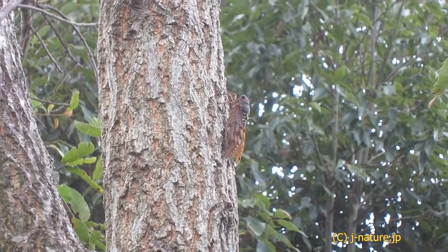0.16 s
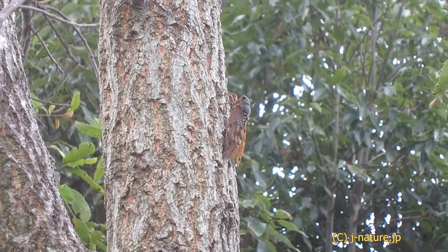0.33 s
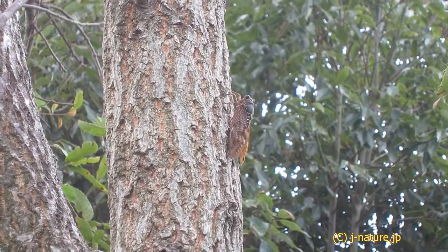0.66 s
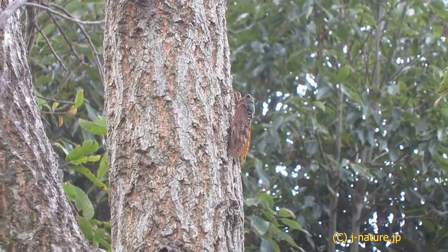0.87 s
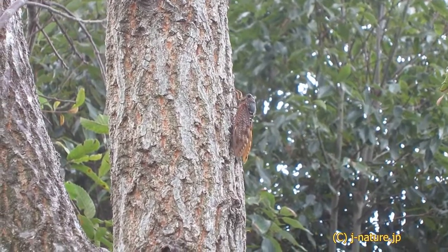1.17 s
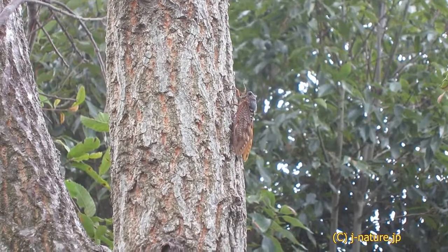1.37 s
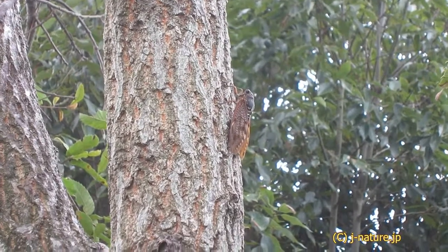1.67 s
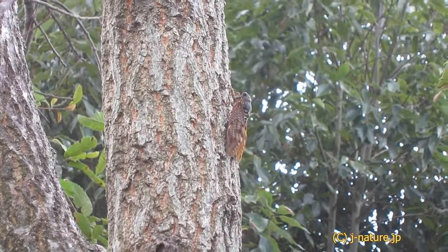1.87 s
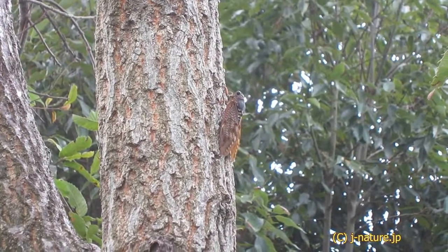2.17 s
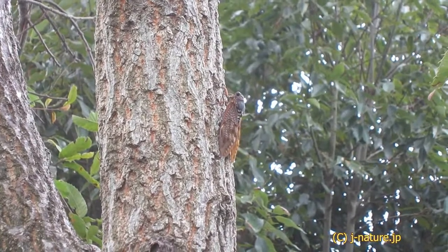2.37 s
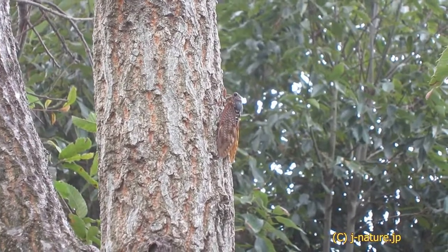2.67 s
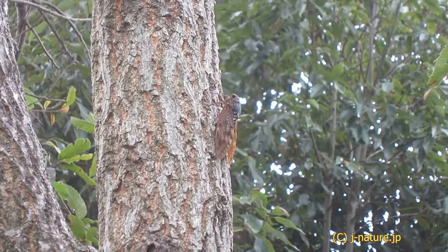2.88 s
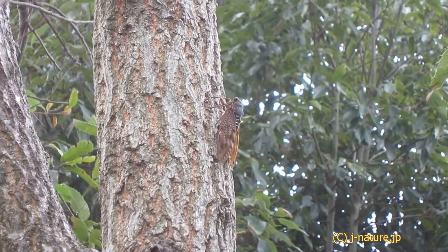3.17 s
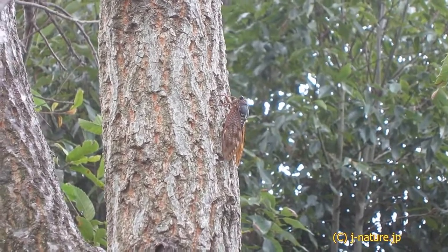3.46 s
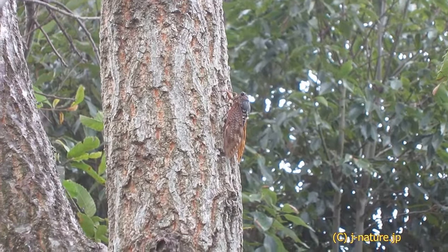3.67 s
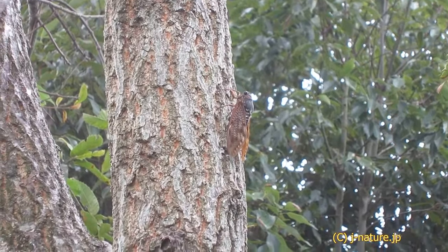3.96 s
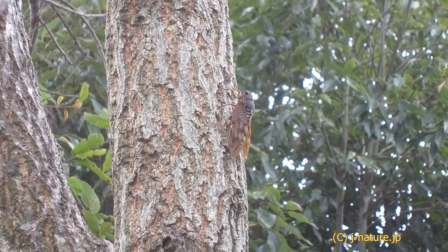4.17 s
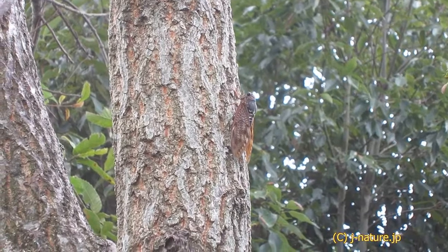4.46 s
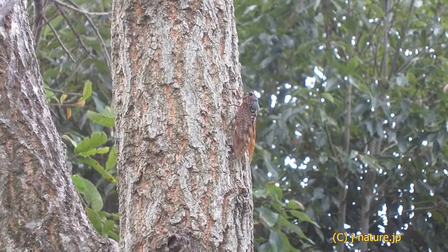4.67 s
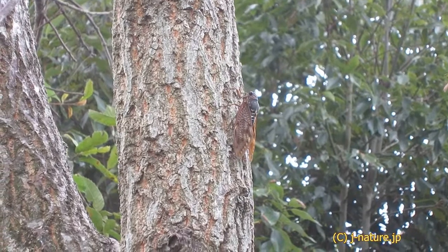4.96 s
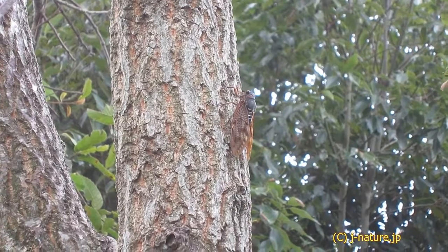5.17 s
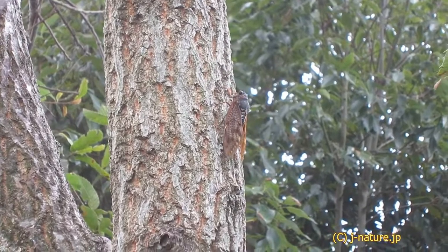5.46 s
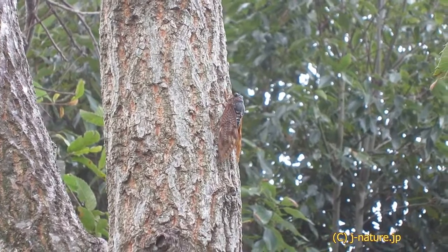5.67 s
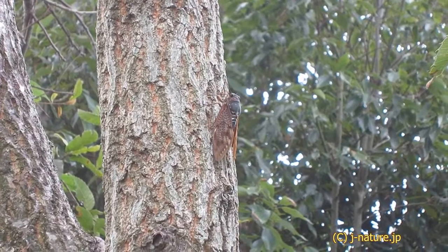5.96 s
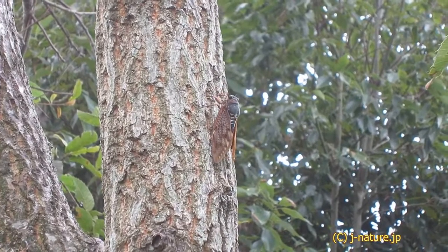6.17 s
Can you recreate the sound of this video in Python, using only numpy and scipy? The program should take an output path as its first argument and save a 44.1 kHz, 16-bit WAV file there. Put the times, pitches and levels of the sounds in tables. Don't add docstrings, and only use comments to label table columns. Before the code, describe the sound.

Close, dry and crisp: a cicada's woody clicks scatter irregularly, then burst into a rasping zip of some twenty strokes lasting under a tenth of a second, eleven times at regular spacing. Far quieter, another insect trills thinly and high, a bird twitters in quick dipping notes, a dove coos low, and distant rumble and airy leaf hiss fill the outdoor grove.

```python
import sys
import numpy as np
from scipy import signal
from scipy.fft import rfft, irfft, next_fast_len
from scipy.io import wavfile
from scipy.ndimage import uniform_filter1d, map_coordinates

SR = 44100
rng = np.random.default_rng(int(sys.argv[2]) if len(sys.argv) > 2 else 0)


def makeup_ratio(level_db):
    decades = np.asarray(level_db, float) / 20
    return 10 ** decades


def wrap_up_sound(samples):
    columns = np.atleast_2d(samples).T
    tamed = np.clip(columns, -1, 1)
    steps = np.round(tamed * 32767).astype(np.int16)
    wavfile.write(sys.argv[1], SR, steps)


N = 278712


def unit(x):
    return x / np.sqrt(np.mean(x ** 2) + 1e-20)


def along(points, hz):
    f, v = np.transpose(points)
    return np.interp(np.log(hz + 1), np.log(f + 1), v)


def wobble(rate):
    return map_coordinates(rng.standard_normal(int(N * rate / SR) + 4), [np.arange(N) * rate / SR])


def filtered(x, response):
    m = next_fast_len(N + SR // 2)
    return irfft(rfft(x, m) * response(np.fft.rfftfreq(m, 1 / SR)), m)[..., :N]


def resonant(modes):
    def response(f):
        total = 0
        for k, (centre, width, db) in enumerate(modes):
            damping = 1j * f * width
            total = total + (-1) ** k * makeup_ratio(db) * damping / (centre * centre - f * f + damping)
        return total
    return response


def rung(t, hz, t60, attack, phase=0.):
    t = np.maximum(t, 0)
    return np.sin(2 * np.pi * hz * t + phase) * makeup_ratio(-60 * t / t60) * (1 - np.exp(-(t / attack) ** 2))


def rush(spectrum, alike):
    def mid_side(hz):
        turn = np.arccos(np.clip(along(alike, hz), -1, 1)) / 2
        return makeup_ratio(along(spectrum, hz)) * [np.cos(turn), np.sin(turn)]
    mid, side = filtered(rng.standard_normal((2, N)), mid_side)
    return unit(np.array([mid + side, mid - side]))


def scattered(x, t60s):
    wet, step = np.zeros((2, N + SR)), SR // 3
    for start in range(0, N, step):
        hz, t, z = signal.stft(rng.standard_normal((2, SR // 4)), SR, nperseg=128)
        decay = makeup_ratio(-60 * t / along(t60s, hz)[:, None])
        tail = signal.istft(z * decay, SR, nperseg=128)[1]
        tail = tail / np.linalg.norm(tail[0])
        part = signal.fftconvolve(x[None, start:start + step], tail, axes=1)
        wet[:, start:start + part.shape[1]] += part
    return wet[:, :N]


def ticks():
    # time in s, ring in dB.
    away_alone = [(.0071, -20.5), (.0398, -25), (.8968, -24), (1.1291, -26.5), (1.1612, -24), (1.359, -25),
                  (1.3881, -23.5), (1.437, -23.5), (1.4672, -25.5), (1.7626, -24.5), (1.9249, -27),
                  (1.9899, -22), (2.0406, -25), (2.3234, -25.5), (2.3796, -27), (2.5792, -24),
                  (3.0454, -21), (3.1238, -23.5), (3.152, -21.5), (3.1781, -28), (3.4806, -22),
                  (3.536, -19), (3.5882, -21.5), (3.8154, -26), (4.0816, -21.5), (4.1363, -21.5),
                  (4.2689, -24.5), (4.3177, -26), (4.3579, -24.5), (4.4287, -22),
                  (4.478, -16.5), (4.6756, -23), (4.7004, -23.5), (4.7994, -24), (4.8888, -23.5),
                 (4.9814, -26), (5.2403, -21.5), (5.3077, -20), (5.3332, -22), (5.363, -22),
                 (5.4163, -20.5), (5.4653, -22), (5.531, -22), (5.5762, -20), (5.6295, -21.5),
                 (5.6543, -25), (5.664, -22), (5.8703, -22), (5.9991, -21), (6.0267, -21), (6.058, -20.5),
                 (6.091, -21), (6.1225, -24.5), (6.1975, -22), (6.2303, -25), (6.251, -21.5), (6.2675, -29)]
    # time in s, ring in dB.
    facing_alone = [(.4623, -27), (.534, -26.5), (.5814, -23.5), (.6032, -24.5), (.656, -23.5), (.729, -22),
                    (.7821, -21), (.8057, -27.5), (.8709, -26), (.8874, -26), (1.2708, -37), (1.524, -24),
                    (2.4231, -24), (2.666, -22.5), (2.6759, -20), (2.9037, -24), (2.9965, -28),
                    (3.0871, -25), (3.4523, -25), (3.623, -30), (3.642, -24), (3.7426, -26),
                    (3.7837, -26.5), (3.8378, -28), (4.182, -26.5), (4.2146, -26.5), (5.0353, -35),
                    (5.2939, -20.5), (5.435, -28), (5.5032, -27)]
    # time in s, ring in dB, lag in ms, second ring in dB.
    pair_rows = [(.0917, -25, 4.8, -23), (.1373, -27, 4.9, -26), (0.1835, -26, 6.2, -22.5),
                 (0.2289, -26, 6.2, -25.5), (0.27, -25, 6.5, -22), (.299, -23, 5.4, -20),
                 (1.0709, -25, 4.8, -22), (1.209, -24.5, 5.4, -21.5), (1.2604, -22.5, 6.3, -24),
                 (1.4902, -25.5, 4.9, -25), (1.5154, -23, 4.9, -27), (1.682, -23.5, 5.3, -21.5),
                 (1.7986, -22, 4.5, -23), (1.8809, -26, 4.8, -22.5), (2.0055, -29, 6, -23),
                 (2.0734, -21.5, 2.5, -24), (2.1, -26, 8.6, -24), (2.1167, -22, 4.6, -27),
                 (2.2813, -26.5, 4.5, -25), (2.3485, -21.5, 4.8, -19.5),
                 (2.4577, -26, 5.2, -21), (2.4925, -23.5, 7.1, -29), (2.5365, -23, 6.5, -28),
                  (2.8412, -26.5, 4.5, -24), (2.9335, -23.5, 6.9, -24), (2.9603, -21, 6.3, -21),
                  (3.2603, -23, 6.3, -22), (4.0254, -23.5, 5.5, -27.5), (4.1592, -25, 5.1, -20),
                  (4.4536, -24, 6.8, -20), (4.6268, -26, 5.7, -22.5), (4.935, -24.5, 6.6, -27),
                  (5.0264, -22.5, 4.9, -27), (5.0575, -22, 6.4, -21), (5.0729, -18, 3.7, -23),
                  (5.2682, -22.5, 5.5, -23.5), (5.8294, -21.5, 5.4, -22)]
    s, first_db, lag_ms, second_db = np.transpose(pair_rows)
    away = np.concatenate([away_alone, np.transpose([s, first_db])])
    facing = np.concatenate([facing_alone, np.transpose([s + lag_ms / 1000, second_db])])
    rows = []
    for tymbal, snap_db in ((away, -27), (facing, -22.5)):
        s, ring_db = tymbal.T
        snap_db = snap_db + 0.33 * (ring_db + 32.5) + 2.03 * rng.standard_normal(len(s))
        hz = 4570 + 14 * (ring_db + 18)
        rows.append(np.transpose([s, ring_db, hz, snap_db]))
    return rows


def buzzes():
    # first pair in s, last pair in s, strength in dB, top pitch in Hz.
    buzz_rows = [(0.3118, 0.3682, 2.5, 5680), (0.909, 0.9795, 2.5, 5570), (1.532, 1.5938, 3.5, 5580),
                 (2.126, 2.1904, 1.5, 5570), (2.688, 2.7619, 1.3, 5440), (3.278, 3.3435, 2, 5480),
                 (3.86, 3.9368, 1, 5440), (4.482, 4.5447, 2.7, 5490), (5.082, 5.1396, 1.2, 5350),
                 (5.672, 5.7445, 1.2, 5340), (6.271, 6.3412, 1.5, 5270)]
    stroke_counts = [20, 23, 21, 22, 23, 22, 24, 21, 20, 24, 22]
    # share of the buzz, ring in dB, abdomen stretch 0-1, snap in dB.
    swell_rows = [
        (0, -24, 0, -22.5),
        (.46, -18, 0.25, -19.5),
        (.72, -9, 0.96, -17.5),
        (1.001, -8.5, 1.001, -19.5),
    ]
    shortest_s, quickens = .00554, 2.6
    second_s, jitter_s = .00273, .00012
    share, *swell = np.transpose(swell_rows)
    rows = []
    for (first, last, db, top_hz), count in zip(buzz_rows, stroke_counts):
        back = np.arange((count + 1) // 2)
        slower = np.cumsum(back ** quickens)
        spare_s = last - first - shortest_s * back[-1]
        pairs = last - (shortest_s * back + spare_s * slower / slower[-1])[::-1]
        s = np.ravel(np.transpose([pairs, pairs + second_s]))[:count]
        s = s + jitter_s * rng.standard_normal(count)
        progress = (s - first) / (last - first)
        ring_db, stretch, snap_db = [np.interp(progress, share, c) for c in swell]
        snap_db += 0.28 * (-1.) ** (np.arange(count) + 1)
        rows.append(np.transpose([s, ring_db + db, 4570 + stretch * (top_hz - 4570), snap_db]))
    return rows


def abdomen(t, low_hz, high_hz, strain, shift, chance, own):
    t60 = .045 / (1 + 3.5 * strain)
    low = makeup_ratio(-4 + 3 * strain + .6 * own[:, 1:2]) * rung(t, low_hz, t60, .00022, shift)
    middle_phase = shift - 1.1 + .7 * chance[:, 9:10]
    middle = makeup_ratio(-7 - 3 * strain) * rung(t, (low_hz + high_hz) / 2, .014, .0004, middle_phase)
    high_phase = shift - 2.3 + .6 * strain + .25 * own[:, 3:4]
    high = makeup_ratio(.6 * own[:, 2:3]) * rung(t, high_hz, t60, .00022, high_phase)
    return low + middle + high


def buckling_thud(t, strain, chance):
    thud = makeup_ratio(-18 - 7 * strain) * rung(t, 2170, 0.009, 0.0004, chance[:, 8:9])
    thud = thud + makeup_ratio(-4 - 4 * strain) * rung(t, 3700, 0.0035, 0.00025)
    thud = thud + makeup_ratio(-8) * rung(t, 5800, .002, .0001)
    thud = thud + makeup_ratio(-15) * rung(t, 7500, 0.0025, .0001)
    return makeup_ratio(-9 * strain) * thud


def snap_back(back, strain, chance, own):
    # frequency in Hz, level in dB, t60 in s.
    rib_modes = [(2270, -19, 0.0033), (7290, -6, 0.0016), (8500, -7, 0.002), (9725, -6.5, 0.0039),
                 (12300, 4.5, 0.00063), (14760, -8.5, 0.002)]
    snap = 0
    for k, (f, db, t60) in enumerate(rib_modes):
        hz = f * (1 + 0.051 * strain + 0.033 * chance[:, 3 + k, None])
        level = makeup_ratio(db + 1.2 * own[:, 4 + k, None])
        snap = snap + level * rung(back, hz, t60, .00008, 0.34 * own[:, 11 + k, None])
    return snap


def cicada():
    # time in s, left-right difference in dB.
    balance_drift = [(0, .5), (1.2, 0.9), (3.2, 0.9), (5, 0.5), (6.32, 1.3)]
    s, ring_db, hz, snap_db = np.concatenate(ticks() + buzzes()).T[:, :, None]
    chance = rng.standard_normal((len(s), 50))
    index = (s * SR).astype(int) - 8 + np.arange(400)
    t = index / SR - s + .0001
    strain = np.clip((hz - 4550) / 1000, 0, 1.2)
    back = t - .00275 + 0.00019 * strain + .00005 * chance[:, :1]
    low_hz = (hz - 170 - 440 * strain) * (1 + (0.011 + 0.004 * strain) * chance[:, 1:2])
    high_hz = (hz + 160 + 110 * strain) * (1 + (0.0054 + 0.0023 * strain) * chance[:, 2:3])
    damped = np.exp(-np.abs(t / .003) ** 3)
    echo = makeup_ratio(-9 + 1.5 * chance[:, :1] - 60 * np.abs(back) / .012)
    rattle = np.diff(rng.standard_normal((len(s), 402)), 2)
    rattle_db = ring_db - 32.5 + 0.32 * strain - 60 * np.abs(t) / (0.028 + 0.036 * strain)
    pan_db = np.interp(s, *np.transpose(balance_drift)) / 2
    channels = chance[:, 10:30] + .6 * chance[:, 30:] * [[[1]], [[-1]]]
    out = []
    for c, own in enumerate(channels):
        shift = .3 * own[:, :1] + .1 * c
        modes = (low_hz, high_hz, strain, shift, chance, own)
        ring = damped * abdomen(t, *modes) + echo * abdomen(back, *modes) + buckling_thud(t, strain, chance)
        ring = makeup_ratio(ring_db - 4.0) * ring
        snap = makeup_ratio(snap_db + 4.0) * snap_back(back, strain, chance, own)
        own_rattle = np.diff(rng.standard_normal((len(s), 402)), 2)
        crackle = makeup_ratio(rattle_db) * (t > 0) * (rattle + .5 * own_rattle)
        sound = makeup_ratio(pan_db * (-1) ** c) * (ring + snap + crackle)
        out.append(np.bincount(index.ravel(), sound.ravel(), N + SR)[:N])
    return np.array(out)


def far_singer():
    pulse_db = [-5, 1, -33, -16.5, -14, -46]
    # frequency in Hz, width in Hz, level in dB.
    body_modes = [(7230, 100, -11.5), (6925, 180, 5.5), (8050, 250, -23)]
    # time in s, level in dB.
    far_levels = [(0.0, -48), (2.08, -48), (2.25, -49), (2.94, -47.5), (3.22, -47), (3.41, -48.5),
                  (5.28, -48), (5.37, -49), (6.09, -47), (6.32, -48)]
    t = np.arange(N) / SR
    pulses = 6 * 25.48 * t + 2.12 + 0.048 * wobble(8.8)
    gate = makeup_ratio(np.take(pulse_db, pulses.astype(int) % 6)) * np.sin(np.pi * pulses) ** 2 + 0.59
    note = []
    for _ in "LR":
        phase = 2 * np.pi * 7059 * t + 1.19 * wobble(60) + 1.98 * wobble(4.6)
        note.append(makeup_ratio(2.7 * wobble(36)) * np.sin(phase))
    body, skirt = resonant(body_modes), resonant([(6900, 900, 0)])
    rasp = filtered(rng.standard_normal((2, N)), lambda f: body(f) * skirt(f))
    song = gate * (unit(np.array(note)) + 0.89 * unit(rasp))
    knots, level_db = np.transpose(far_levels)
    return makeup_ratio(np.interp(t, knots, level_db) + 3.0) * unit(song + .5 * scattered(song[0], [(7000, 0.24)]))


def neighbour():
    # start in s, end in s, from Hz, to Hz, level in dB.
    rising_calls = [
        (0.29, 0.599, 7300, 8440, -64.5),
        (1, 1.3, 7600, 8700, -68),
        (3.44, 3.765, 7800, 8500, -67),
        (5.2, 5.578, 7340, 8340, -60.5),
    ]
    t = np.arange(N) / SR
    out = np.zeros((2, N))
    for start, end, from_hz, to_hz, db in rising_calls:
        u = np.clip((t - start) / (end - start), 0, 1)
        rasp = unit(uniform_filter1d(uniform_filter1d(rng.standard_normal((2, N)), 60), 60))
        glide = np.sin(2 * np.pi * np.cumsum(from_hz + (to_hz - from_hz) * u) / SR)
        out += makeup_ratio(db + 14.5) * np.sin(np.pi * u) ** 0.41 * rasp * glide
    return out


def bird():
    # first note in s, number of notes (rounded down), level in dB.
    phrases = [(.41, 3, -67), (1.018, 3.6, -51.5), (1.401, 8, -76), (2.3, 9, -65), (4.725, 6.4, -52),
               (5.131, 3.7, -52.5), (5.9, 2.3, -69)]
    song = np.zeros(N)
    u = np.linspace(0, 1, round(.062 * SR))
    note = np.sin(np.pi * u) * np.sin(2 * np.pi * np.cumsum(3330 + 1300 * (u - .6) ** 2) / SR)
    for first, count, db in phrases:
        for k in range(int(count)):
            song[round((first + .078 * k) * SR):][:len(u)] += makeup_ratio(db + 9) * note
    return .3 * song * wobble(150) + .6 * scattered(song * (.5 + wobble(120)), [(3300, .08)])


def dove():
    # start in s, end in s, frequency in Hz, level in dB.
    coo_rows = [(0, 0.225, 430, -60.5), (0.454, 0.756, 400, -62.5), (2.1, 2.36, 430, -64.5),
                (2.553, 2.762, 400, -65), (4.15, 4.36, 429, -61), (4.6, 4.8, 397, -65)]
    t, coos = np.arange(N) / SR, np.zeros(N)
    for start, end, hz, db in coo_rows:
        swell = np.sin(np.pi * np.clip((t - start) / (end - start), 0, 1)) ** 0.47
        coos += makeup_ratio(db + 3.5) * swell * np.sin(2 * np.pi * hz * t + 0.7 * wobble(28))
    return coos * np.array([[1], [.6]])


def far_chorus():
    # frequency in Hz, width in Hz, level in dB.
    chorus_modes = [(3480, 450, 0)]
    haze = filtered(rng.standard_normal((2, N)), lambda f: resonant(chorus_modes)(f) ** 2)
    return unit(haze) * makeup_ratio(-64.5 + 1.2 * wobble(2.8))


def background():
    # frequency in Hz, spectral level in dB.
    rumble_spectrum = [(15, -49), (26, -1), (178, -0.5), (435, -3), (1000, -11), (1340, -13), (2600, -33),
                       (3380, -75)]
    hiss_spectrum = [(1500, -36), (2900, 9.5), (4500, 7), (6200, 15), (10500, -4.5), (12200, 1),
                     (15700, 2.5), (16200, -60)]
    # frequency in Hz, left-right likeness.
    rumble_likeness = [(30, -0.55), (130, -0.088), (290, -0.39), (700, -0.27), (1400, -0.14), (3000, 1)]
    # frequency in Hz, level in dB.
    hum_tones = [(58, -66), (118, -65), (980, -75.5)]
    t = np.arange(N) / SR
    hum = np.zeros(N)
    for hz, db in hum_tones:
        hum += makeup_ratio(db + 3.5 + 0.8 * wobble(9.1)) * np.sin(2 * np.pi * hz * t + 1.9 * wobble(9.6))
    rumble = makeup_ratio(-51.0 + 0.075 * wobble(1.75)) * rush(rumble_spectrum, rumble_likeness)
    thump = makeup_ratio(-45.5) * np.exp(-((t - .4) / 0.024) ** 2) * np.sin(2 * np.pi * 104 * t)
    hiss = makeup_ratio(-53 + 2.0 * wobble(3.55)) * rush(hiss_spectrum, [(1000, 0.045)])
    return rumble + thump + hum + hiss


def scene():
    # frequency in Hz, level in dB.
    singer_lows = [(900, -11), (1700, 0)]
    # frequency in Hz, t60 in s.
    grove_t60 = [(1500, 0.31), (5000, 0.12), (10000, 0.18), (15000, 0.15)]
    near = filtered(cicada(), lambda hz: makeup_ratio(along(singer_lows, hz)))
    mono = near.mean(0)
    bark = makeup_ratio(-7.0) * scattered(mono, [(5000, 0.033)])
    trees = makeup_ratio(-11) * scattered(np.pad(mono, (150, 0))[:N], grove_t60)
    grove = far_singer() + neighbour() + bird() + dove() + far_chorus() + background()
    return near + bark + trees + grove


def top_cut(x):
    return signal.sosfilt(signal.butter(12, 16720, fs=SR, output="sos"), x)


def record(dry):
    # frequency in Hz, level in dB.
    final_response = [(2300, 0), (3100, -8), (3800, 0), (11000, 0), (12300, -9), (13400, 0), (15750, 0),
                      (15950, -38)]
    heard = filtered(dry, lambda hz: makeup_ratio(along(final_response, hz)))
    return top_cut(heard)


dry = scene()
out = record(dry)
wrap_up_sound(out)
```